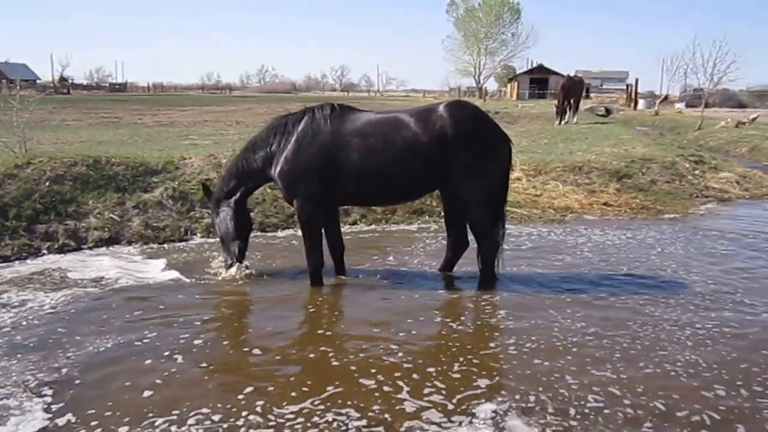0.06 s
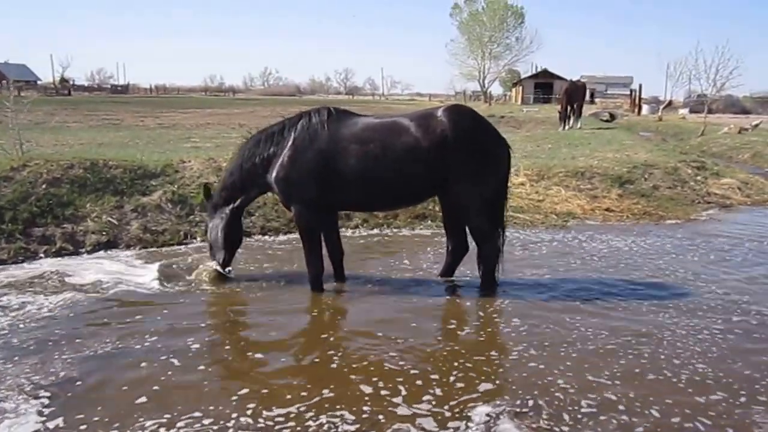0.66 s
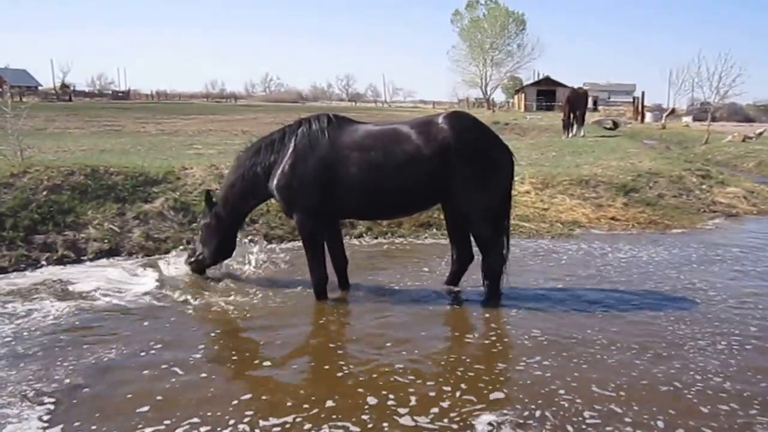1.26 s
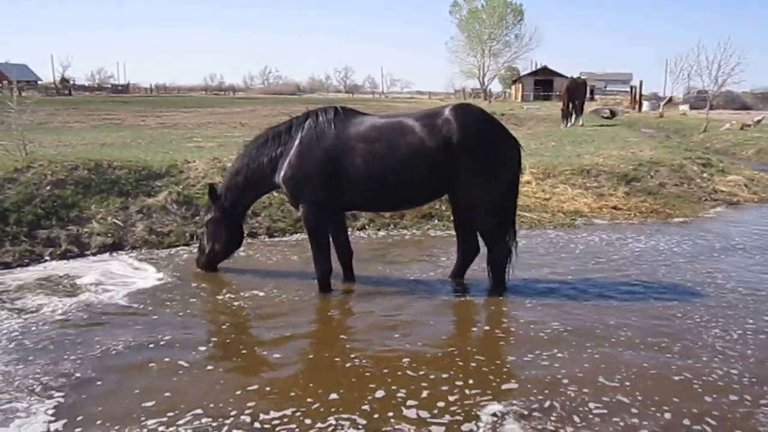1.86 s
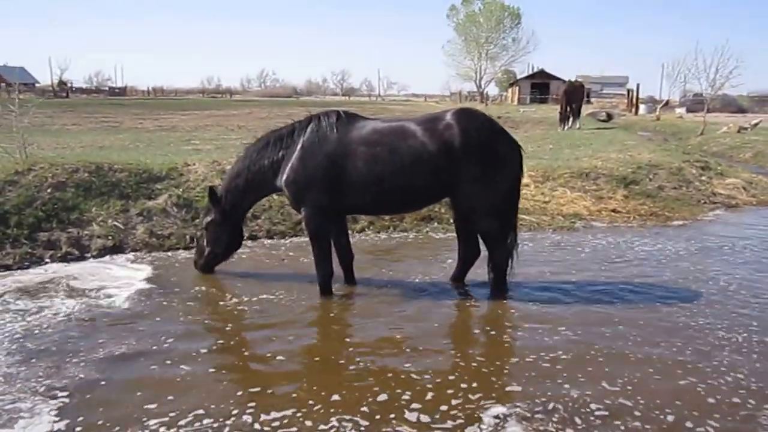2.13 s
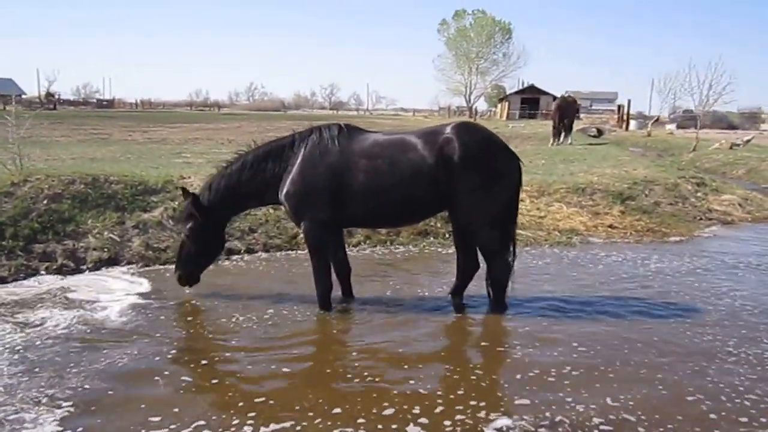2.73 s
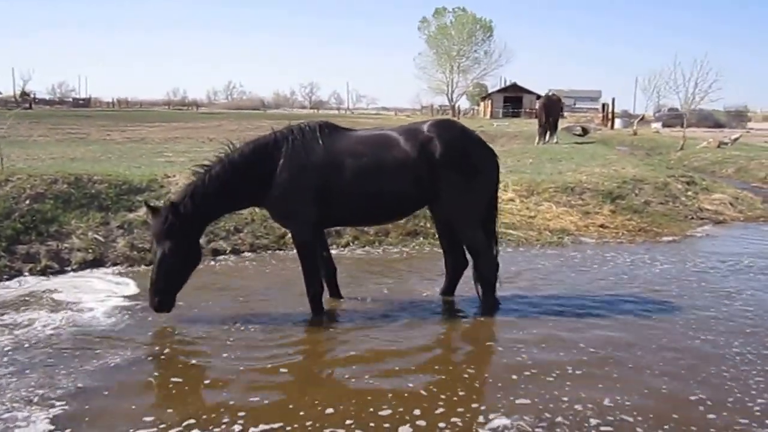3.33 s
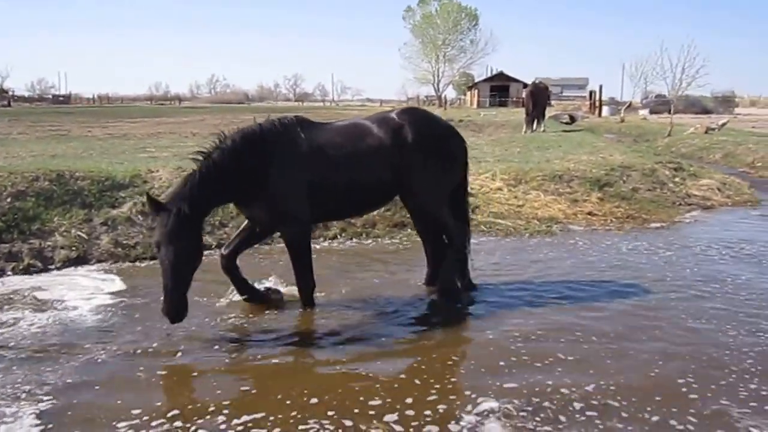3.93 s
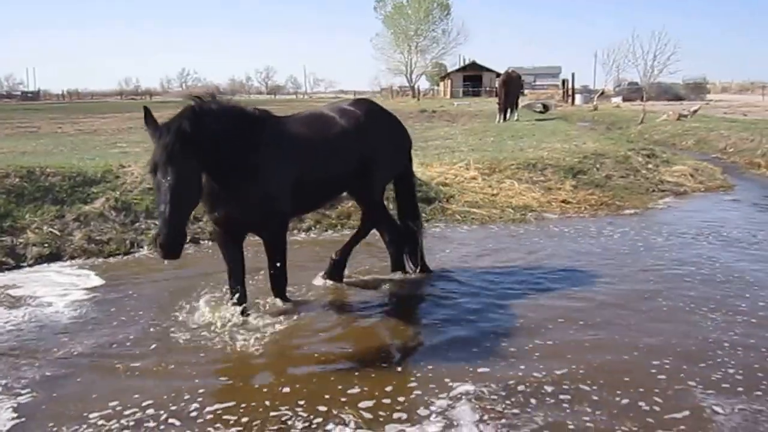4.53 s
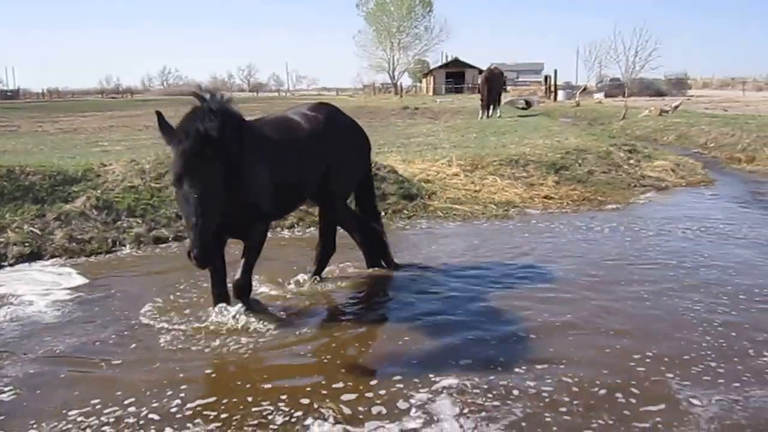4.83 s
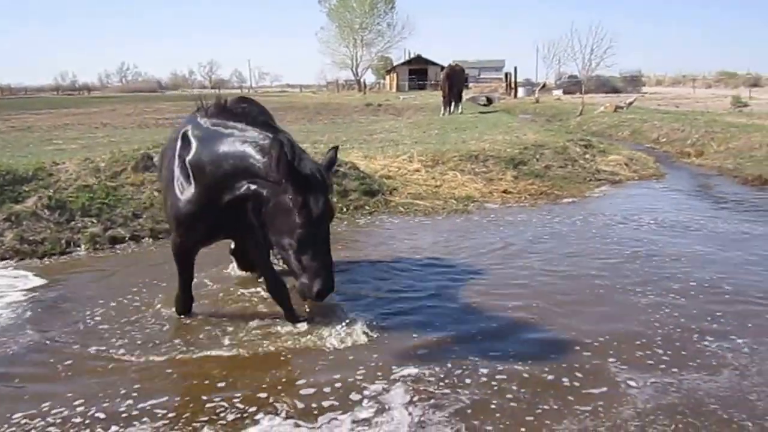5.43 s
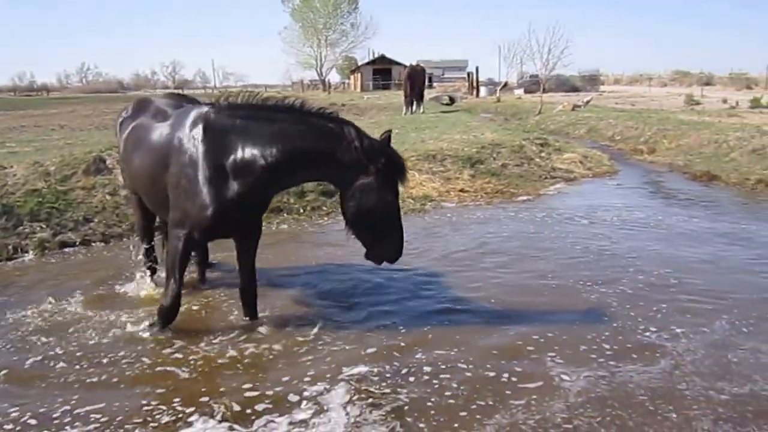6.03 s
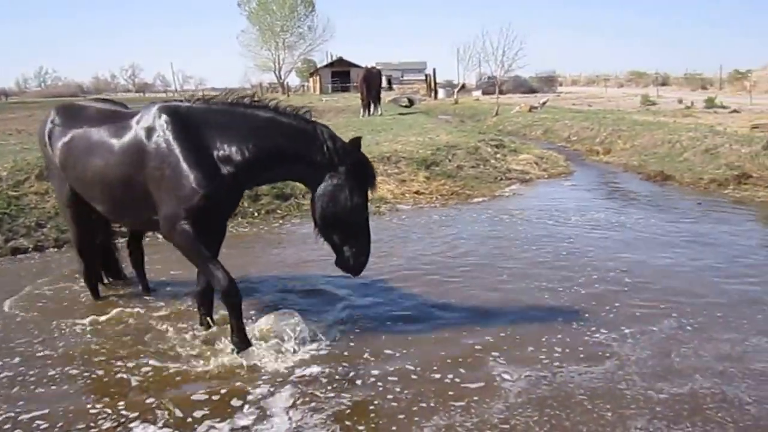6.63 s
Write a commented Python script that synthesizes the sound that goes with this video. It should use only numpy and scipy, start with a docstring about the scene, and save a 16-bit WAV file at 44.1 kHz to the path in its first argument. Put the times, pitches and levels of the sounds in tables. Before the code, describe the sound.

A horse swishes its muzzle in a shallow stream, then wades with splashing steps, over softly rushing water and light wind.

```python
"""In a shallow stream, a horse swishes its muzzle, drips, then wades round with splashing steps.
Each splash is trapped air ringing as bubbles, plus spray falling back: big bubbles ring low, small
ones high. The bank gives a short echo and the stream rushes softly behind. A light breeze rumbles
all the time, and short gusts of wind buffet the microphone."""
import sys
import numpy as np
from scipy import signal
from scipy.fft import rfft, irfft, next_fast_len
from scipy.io import wavfile
from scipy.ndimage import map_coordinates

SR = 44100
rng = np.random.default_rng(int(sys.argv[2]) if len(sys.argv) > 2 else 0)


def log_audio(samples):
    """Write samples as a 16-bit WAV file to the path given in sys.argv[1]."""
    # one column per channel
    frames = np.atleast_2d(samples).T
    # limit to full scale, then quantise
    limited = np.clip(frames, -1, 1)
    pcm = np.round(limited * 32767).astype(np.int16)
    wavfile.write(sys.argv[1], SR, pcm)


N = 294588
TIME = np.arange(N) / SR

# Tone of the rushing stream, from bass to treble: pitch_hz, relative_db
STREAM_TONE = [(15, -29), (25, -8.5), (60, -3), (90, -4), (170, -16), (300, -9.5), (500, -14.5), (880, -19),
               (1700, -20.5), (2600, -23), (4800, -22), (6700, -33), (7600, -52.5)]
# Tone of splashing water: pitch_hz, relative_db
SPLASH_TONE = [(71, -37), (120, -18.5), (232, -8.5), (370, -12), (456, 0.5), (542, 1.5), (740, 1.5),
               (896, -1.5), (1200, -5), (1700, -9.5), (1920, -9), (2810, -8.5), (5620, -18), (6460, -26.5),
               (7550, -39), (9820, -86.5), (16600, -120)]
# Strokes through the water, by the muzzle until 1.6 s, then by the legs:
# start_s, rise_s, hold_s, level_db, gurgle_offset_db, spray_offset_db
WATER_STROKES = [(0, .02, 0.009, -34.5, 0, -11.5), (0.163, 0.021, 0.026, -31, -0.5, -6),
                 (0.225, 0.04, 0.22, -33, -5.5, -11), (0.614, 0.07, 0.012, -34.5, -0.5, -10.5),
                 (0.73, 0.018, 0.034, -40.5, -5.5, -15.5), (0.844, 0.014, 0.15, -40, -1, -4),
                 (0.993, 0.043, .03, -31.5, -1.5, -8.5), (1.166, 0.035, 0.27, -37.5, -3, -6),
                 (1.466, .04, 0.044, -33, -9, -5), (3.868, 0.07, 0.037, -35, 0.5, -11),
                 (3.992, 0.083, 0.027, -38.5, -19, -3.5), (4.116, 0.036, 0.1, -29.5, -2.5, -6),
                 (4.278, 0.025, 0.07, -30, 1.5, -2), (4.397, 0.041, 0.062, -28.5, -5, -7),
                 (4.589, 0.024, 0.066, -30.5, -4, -4.5), (4.791, 0.028, 0.064, -31.5, -1, -7.5),
                 (4.952, 0.026, 0.022, -32.5, -2, -6), (5.128, 0.042, 0.031, -33.5, -2.5, -5),
                 (5.3, 0.076, 0.19, -32, 1, -4.5), (5.543, 0.025, 0.027, -33, -26, -5),
                 (5.731, 0.049, 0.17, -37.5, -1, -3.5), (5.958, 0.045, 0.051, -31.5, 0, -4.5),
                 (6.068, 0.027, .02, -36.5, -8, -10.5), (6.339, 0.07, .06, -32.5, -1, -7.5),
                 (6.502, 0.061, 0.26, -32, -4.5, -4.5)]
# Single large bubbles: start_s, peak_db, pitch_hz, life_cycles
BIG_BUBBLES = [(0.096, -21.5, 553, 7.7), (.128, -22.5, 520, 11), (0.159, -13, 1410, 15),
               (.243, -23.5, 680, 24), (0.4524, -9, 2270, 9.9), (.630, -14, 2960, 22),
               (.677, -26.5, 430, 12), (.989, -18.5, 976, 25), (1.413, -20, 884, 24),
               (1.487, -16.5, 1400, 13), (1.54, -19.5, 1290, 35), (1.782, -33, 886, 51),
               (1.826, -32, 1540, 26), (2.502, -27, 1085, 20), (2.640, -32, 3200, 40),
               (2.833, -23.5, 878, 37), (3.855, -23, 647, 17), (3.878, -18.5, 600, 10),
               (4.319, -14.5, 570, 9), (4.330, -17, 732, 18), (4.419, -15, 1186, 48),
               (4.687, -19.5, 620, 17), (4.742, -22.5, 915, 21), (4.952, -13, 1005, 7.5),
               (5.153, -17, 607, 13.5), (5.685, -23.5, 677, 21), (5.940, -16.5, 485, 29),
               (5.966, -14.5, 780, 12), (6.298, -26, 746, 36), (6.431, -23.5, 541, 38)]
# Water smacking on water: start_s, peak_db, pitch_hz, fade_s (time to fall by 60 dB)
WATER_SLAPS = [(0.157, -14, 2660, 0.0075), (0.176, -14.5, 2600, 0.013), (0.451, -16.5, 2230, 0.013),
               (0.631, -19.5, 2770, 0.012), (0.8403, -15, 1980, 0.0045), (1.019, -19.5, 3740, 0.028),
               (1.2608, -18.5, 2040, 0.022), (1.795, -30.5, 1370, 0.048), (2.509, -19, 1490, 0.058),
               (2.5207, -16.5, 2355, 0.038), (2.946, -27.5, 1183, 0.071), (2.9538, -25.5, 3694, .044),
               (3.388, -31, 2100, 0.033), (3.568, -32, 1440, 0.09), (3.602, -23, 1550, 0.051),
               (3.67, -27.5, 1905, 0.071), (3.691, -22.5, 2530, 0.03), (3.841, -23, 1095, 0.081),
               (3.9954, -17.5, 2750, 0.031), (4.273, -14.5, 1030, .025), (4.4057, -19, 1920, .055),
               (4.899, -14.5, 3200, .036), (4.9681, -13, 1380, .026), (5.1441, -20, 1500, 0.017),
               (5.344, -15.5, 3270, 0.019), (5.578, -15, 3260, 0.0086), (5.912, -18.5, 2320, 0.036),
               (5.932, -14, 2280, 0.011), (6.004, -9.5, 3980, 0.0047), (6.299, -21, 1180, 0.034)]
# Puffs of wind on the microphone: start_s, hold_s, strength_db
WIND_GUSTS = [(1.155, 0.049, -22), (1.256, 0.055, -27.5), (1.367, .06, -23), (2.885, .025, -41),
              (3.057, 0.049, -19.5), (3.142, 0.129, -21), (3.297, 0.096, -24), (4.53, 0.17, -39.5)]
# Tone of the wind's rough buffeting: pitch_hz, relative_db
BUFFET_TONE = [(20, -26), (45, -16), (80, -9), (160, -1.5), (280, -4), (450, -14), (800, -42), (1600, -63),
               (4000, -120)]
# The hardest eddies (small swirls of air): time_s, strength_db, pitch_hz
HARD_EDDIES = [(1.179, -11, 202), (3.072, -3, 300), (3.089, -2, 324), (3.157, -12.5, 313),
               (3.195, -4.5, 306), (3.215, -4, 340), (3.317, -4, 373), (3.367, -2.5, 378), (3.402, -5, 330)]
# Legs dragged deep under the surface: start_s, hold_s, level_db
LEG_DRAGS = [(3.9, .03, -41.5), (4.28, 0.053, -37.5), (5.362, 0.15, -46), (5.86, 0.18, -39)]
# Hooves plunging in, each leaving a pocket of air: start_s, peak_db, pitch_hz
HOOF_PLUNGES = [(4.271, -21, 318), (4.307, -17, 257), (4.944, -33, 257), (5.359, -21.5, 390),
                (5.472, -25.5, 245), (5.812, -12, 475)]

TOP_HZ = 7700  # the highest pitch the recorder keeps


def amp(db):
    """Turn decibels into a number to multiply by."""
    return 10 ** (np.asarray(db) / 20)


def unit(x):
    """Scale x to an average (rms) level of 1."""
    return x / np.sqrt(np.mean(x ** 2) + 1e-20)


def peak_one(x):
    """Scale x so its highest peak is 1."""
    return x / np.abs(x).max()


def filtered(x, response):
    """Turn each pitch in x up or down by response(hz)."""
    size = next_fast_len(len(x) + 8192)
    return irfft(rfft(x, size) * response(np.fft.rfftfreq(size, 1 / SR)), size)[:len(x)]


def colour(x, tone):
    """Shape x with a tone table, at average level 1."""
    pitches, db = np.transpose(tone)
    return unit(filtered(x, lambda hz: amp(np.interp(np.log(hz + 1), np.log(pitches), db))))


def band(x, lo_hz, hi_hz):
    """Keep the part of x between two soft pitch edges, at average level 1."""
    return unit(filtered(x, lambda hz: ((1 + (lo_hz / (hz + 1)) ** 8) * (1 + (hz / hi_hz) ** 8)) ** -.5))


def wobble(rate):
    """A smooth curve through `rate` random points a second."""
    return map_coordinates(rng.standard_normal(int(N * rate / SR) + 4), [TIME * rate])


def add(track, start_s, sound):
    """Mix a sound into the track at a given time."""
    start = max(round(start_s * SR), 0)
    track[start:start + len(sound)] += sound[:max(N - start, 0)]


def swells(starts, holds, dbs, rise_s, fall_s):
    """A loudness curve for events that build up to their start time, hold, then die away."""
    t = TIME[::32, None]
    fade = np.maximum(starts - t, 0) / rise_s + np.maximum(t - starts - holds, 0) / fall_s
    return np.interp(TIME, t[:, 0], np.linalg.norm(amp(dbs) * np.exp(-fade), axis=1))


def noise_burst(t, rise_s, fade_s):
    """A puff of noise that falls by 60 dB in fade_s."""
    return rng.standard_normal(len(t)) * np.exp(-np.log(1000) * t / fade_s) * (1 - np.exp(-t / rise_s))


def bubble(t, hz, cycles, rise, onset_cycles):
    """A pocket of air rings for some cycles, its pitch rising as it nears the surface."""
    age = hz * t / cycles
    note = np.sin(2 * np.pi * hz * t * (1 + rise * age / 2))
    return note * np.exp(-np.log(1000) * age) * (1 - np.exp(-hz * t / onset_cycles))


def swarm(per_s, lo_hz, hi_hz, cycles, spread_db, rise, samples):
    """Many bubbles of random pitch, life and strength, at average level 1."""
    when, pitch, life, strength = rng.random((int(per_s * N / SR), 4)).T[:, :, None]
    hz = lo_hz * (hi_hz / lo_hz) ** pitch
    # small bubbles die sooner, so they are struck harder to keep all pitches even
    gain = hz * amp(-spread_db * np.log(1 - .97 * strength))
    t = np.arange(samples) / SR
    rings = gain * bubble(t, hz, cycles * 2 ** (2 * life - 1), rise, onset_cycles=0.55)
    where = (when * N).astype(int) + np.arange(samples)
    return unit(np.bincount(where.ravel(), rings.ravel(), N)[:N])


def stream(level_db=-46.44):
    """The current rushes steadily, with tiny bubbles bursting in the foam."""
    fizz = swarm(per_s=1100, lo_hz=493, hi_hz=6300, cycles=14, spread_db=-2.5, rise=0.13, samples=1000)
    rush = colour(rng.standard_normal(N) + amp(-6) * fizz, STREAM_TONE)
    return rush * amp(level_db + 0.37 * wobble(4))


def breeze(level_db=-53.5):
    """Light air keeps up a faint, uneven rumble."""
    unrest = amp(1.2 * wobble(7))
    return band(rng.standard_normal(N), 16, 170) * unrest * amp(level_db)


def splashes(settle_s=0.14, spray_settle_s=0.11):
    """Each stroke stirs the foamy water: big bubbles gurgle, small ones splash and spray patters."""
    foam = lambda db: amp(db) * rng.standard_normal(N)
    big = swarm(per_s=520, lo_hz=244.6, hi_hz=1237, cycles=18, spread_db=0, rise=0.14, samples=2600)
    small = swarm(per_s=1000, lo_hz=879, hi_hz=3730, cycles=20.5, spread_db=0.5, rise=0.13, samples=1400)
    drops = swarm(per_s=1800, lo_hz=2500, hi_hz=7360, cycles=20, spread_db=1, rise=0.044, samples=260)
    glugs = swarm(per_s=39, lo_hz=495, hi_hz=1065, cycles=17, spread_db=3, rise=0.11, samples=2600)
    # thrown water lands in clumps, each making bubbles of every size
    clumps = 1.07 * wobble(70)
    gurgle = band(colour(big + amp(-3.5) * glugs + foam(0.7), SPLASH_TONE), 400, 1000)
    gurgle *= amp(-0.26 + 0.7 * clumps + 0.9 * wobble(30))
    splash = band(colour(small + foam(-1.5), SPLASH_TONE), 1093, 2700)
    splash *= amp(0.23 + 1.5 * clumps)
    spray = band(colour(drops + foam(-0.85), SPLASH_TONE), 2960, 9000)
    spray *= amp(1.35 + 1.4 * clumps + 1.0 * wobble(60))
    slosh = band(foam(0), 180, 420) * amp(-16.5)
    starts, rises, holds, level_db, gurgle_db, spray_db = np.transpose(WATER_STROKES)
    return (splash * swells(starts, holds, level_db, rises, settle_s)
            + (gurgle + slosh) * swells(starts, holds, level_db + gurgle_db, rises, settle_s)
            + spray * swells(starts, holds, level_db + spray_db, rises, spray_settle_s))


def bank_echo(water):
    """The earth bank and the moving ripples scatter a short echo that keeps changing."""
    out, t, hop = np.zeros(N), np.arange(SR // 5) / SR, SR // 8
    for start in range(0, N, hop):
        tail = noise_burst(t, rise_s=0.0031, fade_s=0.1)
        add(out, start / SR, signal.fftconvolve(water[start:start + hop], tail / np.linalg.norm(tail)))
    return out


def plops():
    """The largest bubbles stand out as short rising notes."""
    out, t = np.zeros(N), np.arange(SR // 10) / SR
    for start_s, db, hz, cycles in BIG_BUBBLES:
        ring = bubble(t, hz, cycles, rise=0.081, onset_cycles=1.3)
        add(out, start_s, amp(db) * peak_one(ring))
    return out


def slaps(drop_offset_db=-5.5, drop_spread_octaves=0.27):
    """Falling water hits the surface: a smack, a dull thud, a ringing bubble and four flung drops."""
    out, t = np.zeros(N), np.arange(SR // 8) / SR
    for start_s, db, hz, fade_s in WATER_SLAPS:
        burst = noise_burst(t, .07 * fade_s, fade_s)
        # favour a broad range around the slap's pitch, then trim the treble
        smack = signal.lfilter(*signal.iirpeak(hz, Q=0.86, fs=SR), burst)
        smack = signal.lfilter(*signal.butter(4, min(1.27 * hz + 700, TOP_HZ), fs=SR), smack)
        thud = signal.lfilter(*signal.butter(2, [200, 900], "band", fs=SR), burst)
        ring = bubble(t, hz, 0.95 * hz * fade_s, rise=0.047, onset_cycles=7.1)
        slap = peak_one(smack) + amp(-17) * peak_one(thud) + amp(-5) * ring
        add(out, start_s, amp(db) * peak_one(slap))
        for flight, pitch, size in rng.random(size=(4, 3)):
            drop_hz = hz * 2 ** (drop_spread_octaves * (2 * pitch - 1))
            drop = bubble(t, drop_hz, cycles=20, rise=0.11, onset_cycles=0.89)
            landing_s = start_s + 0.36 * fade_s * flight
            add(out, landing_s, amp(db + drop_offset_db) * size * drop)
    return out


def gusts():
    """Gusts rumble on the microphone's opening and carry eddies past it."""
    strength = swells(*np.transpose(WIND_GUSTS), rise_s=0.037, fall_s=0.013)
    # faster air sheds smaller eddies, so a strong gust is brighter than a weak one
    speed = np.clip(strength / amp(-21.5), 0, 1)
    deep = band(rng.standard_normal(N), 48, 130) * np.sqrt(1.1 - .85 * speed ** 2)
    swirls = swarm(per_s=170, lo_hz=92, hi_hz=427, cycles=1.06, spread_db=0, rise=0, samples=2000)
    rough = colour(swirls + amp(1.5) * rng.standard_normal(N), BUFFET_TONE)
    rumble = (deep + speed * rough) * strength * amp(-1.0 + 1.4 * wobble(45))
    return rumble + eddy_thumps(strength, speed)


def eddy_thumps(strength, speed, per_s=30, full_gust_hz=279):
    """Each passing eddy makes the air pressure dip and spring back, heard as a thump."""
    eddies = [(time_s, amp(db), hz) for time_s, db, hz in HARD_EDDIES]
    # lesser eddies come at a loosely even rate and grow with the gust that carries them
    for k, (late, scatter) in enumerate(rng.random((int(per_s * N / SR), 2))):
        time_s = (k + late) / per_s
        i = min(int(time_s * SR), N - 1)
        eddies.append((time_s, strength[i] * amp(7.5 + 4 * scatter), full_gust_hz * np.sqrt(speed[i])))
    out = np.zeros(N)
    t = np.arange(SR // 25) / SR - 0.02  # zero at the middle of the pulse
    for (time_s, gain, hz), lean in zip(eddies, rng.uniform(-0.69, 1, len(eddies))):
        position = 2 * np.pi * hz * t / 3
        pulse = -np.real(np.exp(1j * lean) / (1 - 1j * position) ** 4)  # a smooth, lopsided dip
        add(out, time_s + t[0], gain * pulse)
    return filtered(out, lambda hz: 0.037 + 0.76 / np.sqrt(1 + (hz / 560) ** 4))  # softer and duller


def churn():
    """Wading legs drag big, slow pockets of air under the surface."""
    pockets = swarm(per_s=140, lo_hz=120, hi_hz=400, cycles=8, spread_db=1.5, rise=.15, samples=4000)
    body = band(pockets + amp(-5.5) * rng.standard_normal(N), 150, 350)
    return body * swells(*np.transpose(LEG_DRAGS), rise_s=0.015, fall_s=0.035)


def plunges():
    """A hoof opens an air pocket that rings low and pinches off a smaller one."""
    out, t = np.zeros(N), np.arange(SR // 8) / SR
    for start_s, db, hz in HOOF_PLUNGES:
        pocket = bubble(t, hz, cycles=7.6, rise=0.13, onset_cycles=0.97)
        smaller = bubble(t, 1.54 * hz, cycles=10.8, rise=0.14, onset_cycles=1.6)
        add(out, start_s, amp(db) * peak_one(pocket + 0.69 * smaller))
    return out


def scene():
    """Mix the horse's water sounds, their echo, the stream and the wind into one channel."""
    water = splashes() + plops() + slaps() + plunges() + churn()
    return (water + amp(-14) * bank_echo(water) + stream() + gusts() + breeze())[None]


def record(dry):
    """The recorder rounds off the highest peaks, softens the treble and keeps nothing above TOP_HZ."""
    rounded = dry[0] / (1 + np.abs(dry[0] / .5) ** 6) ** (1 / 6)
    return filtered(rounded, lambda hz: (hz < TOP_HZ) / np.sqrt(1 + (hz / 6950) ** 36))[None]


dry = scene()
out = record(dry)
log_audio(out)
```